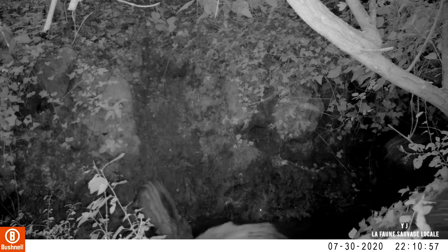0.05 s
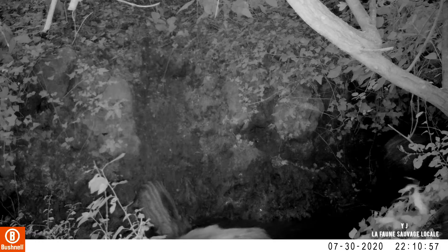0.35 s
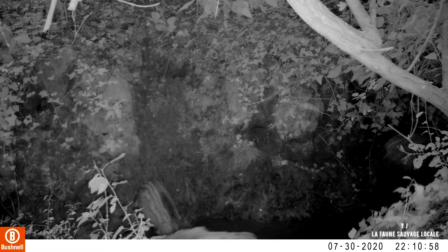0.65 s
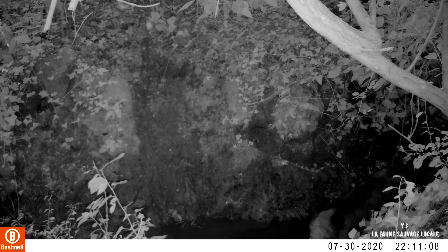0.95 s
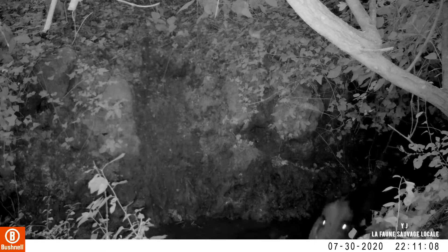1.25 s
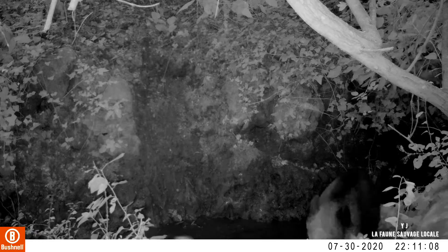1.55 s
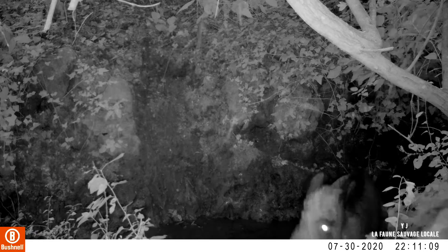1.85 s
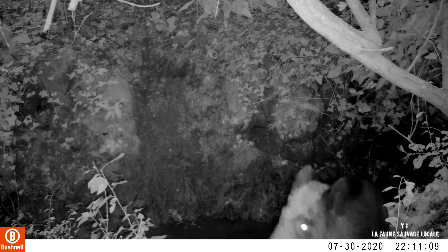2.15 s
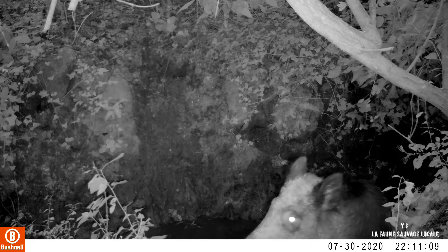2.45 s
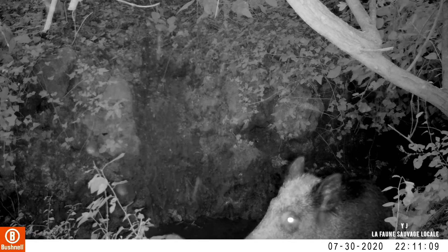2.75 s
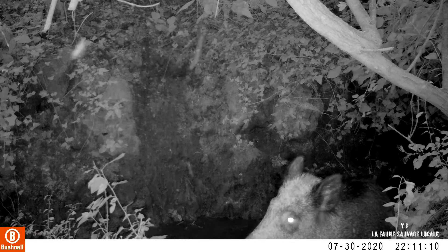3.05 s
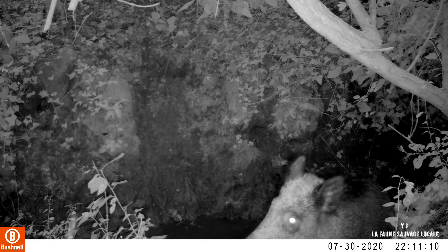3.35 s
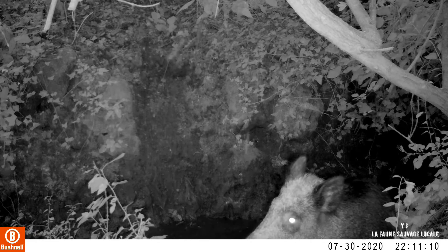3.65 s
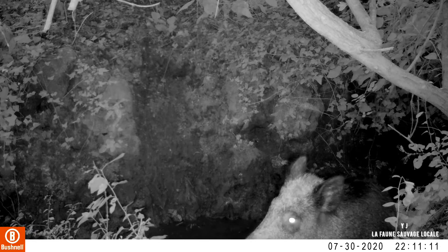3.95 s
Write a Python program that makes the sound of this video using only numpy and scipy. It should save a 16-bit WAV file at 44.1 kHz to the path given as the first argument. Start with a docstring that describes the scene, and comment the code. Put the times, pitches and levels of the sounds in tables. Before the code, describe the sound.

Leaves crunch and twigs snap under a wild boar pushing through brush at night.

```python
"""A wild boar pushes through the undergrowth at night, close by.
Each shove or step crushes wet leaves and thin stems in a burst of tiny cracks.
Twigs snap, and its feet or snout make hollow squelches and thuds in the wet ground.
The bank and trees send back short echoes, over a faint steady hiss and hum."""
import sys
import numpy as np
from scipy import signal
from scipy.fft import rfft, irfft
from scipy.io import wavfile

SR = 44100
rng = np.random.default_rng(int(sys.argv[2]) if len(sys.argv) > 2 else 0)


def unload_wav(signal):
    """Save mono or channel-first audio to the path in sys.argv[1] as 16-bit WAV at rate SR, clipped to [-1, 1]."""
    wavfile.write(
        sys.argv[1],
        SR,
        np.round(np.clip(np.atleast_2d(signal).T, -1, 1) * 32767).astype(np.int16),
    )


N = 176400
TIME = np.arange(N) / SR

# Tone of the night's hiss: f/Hz, relative level/dB
HISS_SPECTRUM = [(25, -16), (60, -9.5), (120, -6.5), (270, -0.5), (1000, 3), (1600, 1.5), (3000, -2),
                 (4000, -7.5), (5000, -14.5), (6300, -25), (8000, -34), (12000, -37.5), (16000, -42)]
# Squelches and thuds: t/s, level/dB, f/Hz, decay time/s
SQUELCHES = [(0.495, -35.5, 1080, 0.0035), (1.123, -30, 1050, 0.019), (1.344, -17, 1253, 0.012),
             (1.496, -24.5, 1570, 0.0088), (1.548, -22, 2210, 0.017), (1.558, -22.5, 1490, 0.012),
             (1.578, -26, 1220, 0.021), (1.602, -27.5, 993, 0.014), (1.602, -34.5, 693, 0.016),
             (1.618, -24, 1140, 0.0075), (2.054, -34, 301, 0.008), (2.068, -33, 303, 0.0042),
             (2.135, -21, 1357, 0.005)]
# Snapping twigs: t/s, peak level/dB, f/Hz, band width/ratio to f, bright edge/dB relative to the peak
TWIG_SNAPS = [(0.1447, -23, 2660, 1.24, -46), (0.3502, -22, 2300, 1.45, -37), (0.4182, -28, 2940, 1.6, -36),
              (0.442, -22, 2700, 1.4, -34), (.5289, -25, 3780, 1.4, -26), (0.705, -19, 2680, 1.31, -47),
              (0.9261, -26, 4700, 1.37, -29), (1.0355, -12.5, 2580, 1.3, -30),
              (1.239, -23.5, 3900, 1.09, -31), (1.4493, -11.5, 2600, 1.7, -39),
              (1.557, -13.5, 1990, 1.15, -33), (2.0162, -10, 2530, 1.56, -45), (2.041, -16, 3500, 2.2, -20),
              (2.0854, -12, 3700, 1.4, -32), (2.136, -11, 1590, 1.33, -42), (2.4864, -15.5, 2360, 1.3, -26),
              (2.7523, -19, 2900, 1.12, -32), (2.890, -12, 2240, 1.31, -27), (3.1363, -6, 2600, 1.54, -26),
              (3.1456, -11, 2670, 3.5, -25), (3.527, -7, 2500, 1.43, -28), (3.5305, -9.5, 1680, 1.55, -34),
              (3.649, -7.5, 1750, 1.34, -34), (3.694, -16, 2300, 2.3, -40), (3.7305, -5, 1800, 1.95, -54)]
# Tone of crushed leaves: f/Hz, relative level/dB
LEAF_SPECTRUM = [(100, -32), (280, -13), (800, -5.5), (1300, 0.5), (2000, 1), (2800, 0), (4000, -7.5),
                 (5000, -16), (6300, -26.5), (8000, -39.5), (12000, -42.5), (16000, -51)]
# The boar's shoves and steps in the leaves: t/s, length/s, relative level/dB, brightness/(dB per octave)
SHOVES = [(0.0, 0.017, -43, -4), (0.136, 0.015, -39.5, -2), (0.203, 0.018, -39.5, 2.5),
          (0.361, 0.014, -33, 0), (0.44, 0.017, -44, 3.5), (0.56, 0.067, -34.5, -4.5),
          (0.68, 0.05, -36, -1), (0.837, 0.027, -47, -1), (0.95, 0.037, -35.5, -2),
          (0.994, 0.014, -31, 0.5), (1.096, 0.22, -32, -0.5), (1.276, 0.049, -27, -0.5),
          (1.335, 0.086, -23.5, 0), (1.442, 0.11, -28.5, 1), (1.484, 0.029, -25.5, 0.5),
          (1.535, 0.055, -31, 0), (1.585, 0.089, -31.5, -1.5), (1.672, 0.05, -27.5, -0.5),
          (1.757, 0.023, -30.5, 1.5), (1.82, 0.16, -37.5, 2), (1.962, 0.014, -29.5, 0),
          (2.013, 0.043, -29, 1.5), (2.051, 0.12, -27.5, 0.5), (2.21, 0.081, -26, 0),
          (2.312, 0.17, -36.5, 0), (2.477, 0.065, -35.5, -0.5), (2.582, 0.06, -33.5, 2),
          (2.631, 0.05, -30, -1), (2.665, 0.02, -26, 1.6), (2.735, 0.088, -32.5, -0.5),
          (2.816, 0.017, -33, 5), (2.857, 0.035, -26.5, 1.5), (2.915, 0.1, -36.5, -1),
          (3.045, 0.1, -29.5, 0.5), (3.132, 0.024, -26.5, 1.5), (3.23, 0.075, -39.5, 2),
          (3.292, 0.099, -31.5, 1), (3.423, 0.08, -27, 1), (3.543, 0.11, -31, 1.5),
          (3.669, 0.089, -37, 2.5), (3.781, 0.1, -37, -0.5), (3.877, 0.027, -31, 0),
          (3.945, 0.049, -39.5, -2)]

LEAF_MID_HZ = 1800   # a shove's brightness tilts its tone around this pitch


def from_db(db):
    """Turn decibels into a number to multiply by."""
    return 10 ** (np.asarray(db) / 20)


def unit_rms(x):
    """Scale a signal so that its average size (rms) is 1."""
    return x / np.sqrt(np.mean(x ** 2) + 1e-20)


def band(x, hz, ratio, order=2):
    """Keep the pitches between hz / ratio and hz * ratio."""
    edges = [hz / ratio, min(hz * ratio, .47 * SR)]
    return signal.sosfilt(signal.butter(order, edges, "band", fs=SR, output="sos"), x + 1e-18)


def dull(x, cutoff_hz=4700):
    """Take the treble off a crack while keeping it short."""
    return np.convolve(x, signal.firwin(41, cutoff_hz, window="blackman", fs=SR), "same")


def coloured(noise, spectrum):
    """Give a noise the tone listed in a table, at an average size of 1."""
    hz, db = np.transpose(spectrum)
    bin_hz = np.fft.rfftfreq(N, 1 / SR)
    bin_db = np.interp(np.log(bin_hz + 1), np.log(hz), db)
    return unit_rms(irfft(rfft(noise) * from_db(bin_db), N))


def drift(rate_hz):
    """A smooth random wobble of size about 1, worked out every 40 samples."""
    pole = np.exp(-2 * np.pi * rate_hz * 40 / SR)
    noise = rng.standard_normal(N // 40 + 2002)
    wobble = signal.lfilter([1], [1, -2 * pole, pole * pole], noise)[2000:]
    return np.interp(np.arange(N) / 40, np.arange(len(wobble)), unit_rms(wobble))


def clicks(per_s, spread_db):
    """Tiny clicks of uneven size at random moments."""
    sizes = from_db(spread_db * np.minimum(rng.exponential(1, N), 4))
    signs = rng.choice([-1, 1], N)
    return sizes * signs * (rng.random(N) < per_s / SR)


def night():
    """A steady hiss and a faint wavering hum, both made of noise."""
    hiss = coloured(rng.standard_normal(N), HISS_SPECTRUM)
    hum = unit_rms(band(rng.standard_normal(N), hz=266.1, ratio=1.02))
    return from_db(-42) * hiss + from_db(-61.5) * hum


def echoes(sound, level_db=-14, fade_s=0.38):
    """The bank and trunks send back many weak echoes, which fall by 60 dB in fade_s."""
    t = TIME[:SR // 2]
    tail = rng.standard_normal(len(t)) * from_db(-60 * t / fade_s)
    return from_db(level_db) * signal.fftconvolve(sound, tail / np.linalg.norm(tail))[:N]


def squelches(attack_s=0.0043):
    """Each push of a foot or the snout makes a hollow in the wet ground ring briefly."""
    out, t = np.zeros(N + SR), TIME[:SR // 5]
    for start, db, hz, decay_s in SQUELCHES:
        shape = np.minimum(t / attack_s, 1) * np.exp(-np.maximum(t - attack_s, 0) / decay_s)
        ring = band(rng.standard_normal(2 * len(t)), hz, ratio=1.09)[len(t):]
        i = int(start * SR)
        out[i:i + len(t)] += from_db(db) * unit_rms(ring * shape) * np.sqrt(np.mean(shape ** 2))
    return out[:N]


def twigs(splinter_db=-21.5, splinter_s=0.0016, edge_s=0.0026, edge_top_hz=8700):
    """A twig snaps in one dry pulse with a bright edge, and its fibres tear just after."""
    out, t = np.zeros(N + SR), TIME[:SR // 20]
    soften = signal.butter(1, edge_top_hz, fs=SR, output="sos")
    lead = 20   # samples of room, as dull() spreads the pulse both ways
    for start, db, hz, width, edge_db in TWIG_SNAPS:
        splinters, edge_noise = rng.standard_normal((2, len(t)))
        force = (t == 0) + from_db(splinter_db) * splinters * np.exp(-t / splinter_s)
        body = dull(np.pad(band(force, hz, width), (lead, 0)))[:len(t)]
        edge = from_db(edge_db) * signal.sosfilt(soften, edge_noise) * np.exp(-t / edge_s)
        i = int(start * SR) - lead
        out[i:i + len(t)] += from_db(db) * (body / np.abs(body).max() + edge)
    return out[:N]


def crushing(hz, attack_s=0.021, release_s=0.04):
    """How strong the rustle is at one pitch: each shove swells, holds and dies away."""
    t, power = TIME[::32], 0
    octaves = np.clip(np.log2(hz / LEAF_MID_HZ), -2, 2)
    for start, length, db, brightness in SHOVES:
        swell = np.clip((t - start) / attack_s + .5, 0, 1)
        fade = np.exp(-np.maximum(t - start - length, 0) / release_s)
        power = power + (swell * fade * from_db(db + brightness * octaves)) ** 2
    return np.interp(TIME, t, np.sqrt(power))


def stems(cracks_per_s=260):
    """Thin stems of three sizes crack under each shove and keep ticking in between."""
    cracks = sum(band(clicks(cracks_per_s / 3, spread_db=4), hz, ratio=1.58) for hz in (1700, 2600, 3600))
    strength = crushing(LEAF_MID_HZ) + from_db(-39.5)   # the added part never stops
    return from_db(-14) * unit_rms(dull(cracks)) * strength


def leaves(flicker_db=1):
    """Wet leaves crush in thousands of tiny cracks; each half-octave band flickers under the shoves."""
    centres_hz = np.geomspace(90, 14000, 16)
    ratio = np.sqrt(centres_hz[1] / centres_hz[0])
    crackles = [coloured(clicks(per_s=5000, spread_db=1.5), LEAF_SPECTRUM) for _ in range(2)]
    shared_wobble, out = drift(rate_hz=56), 0
    for k, hz in enumerate(centres_hz):
        crackle = band(crackles[k % 2], hz, ratio, order=3)   # next-door bands get different clicks
        flicker = from_db(flicker_db * (shared_wobble + drift(rate_hz=51)))
        out = out + crackle * crushing(hz) * flicker
    return from_db(-2) * out


def scene():
    """The boar in the undergrowth, its echoes and the night, in one channel."""
    boar = leaves() + stems() + twigs() + squelches()
    return (boar + echoes(boar) + night())[None]


def record(dry):
    """Cut away the very highest treble, above 15900 Hz."""
    return signal.sosfilt(signal.ellip(10, .1, 60, 15900, fs=SR, output="sos"), dry)


dry = scene()
out = record(dry)
unload_wav(out)
```